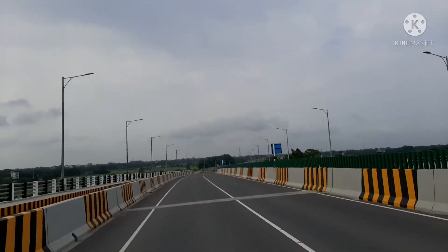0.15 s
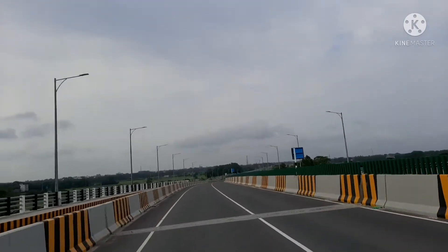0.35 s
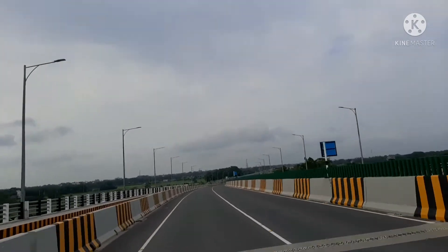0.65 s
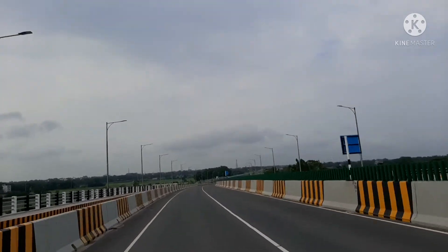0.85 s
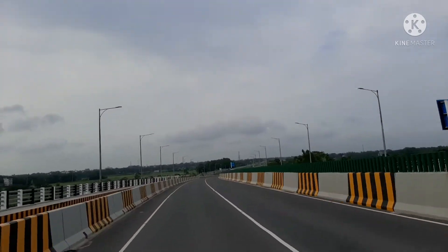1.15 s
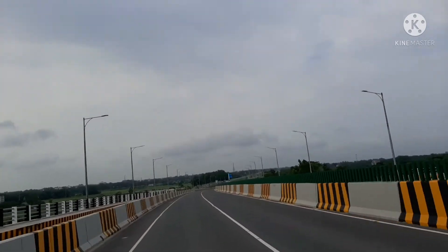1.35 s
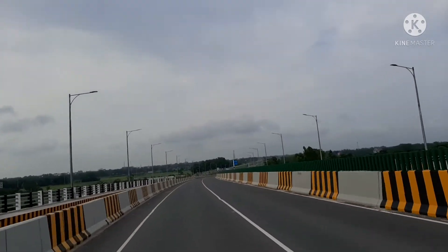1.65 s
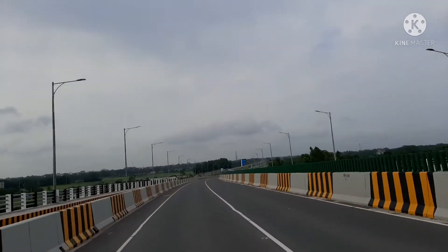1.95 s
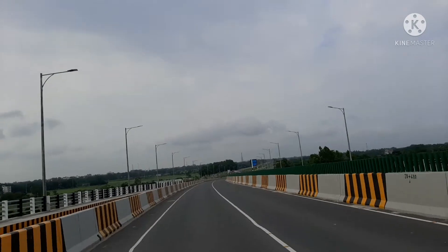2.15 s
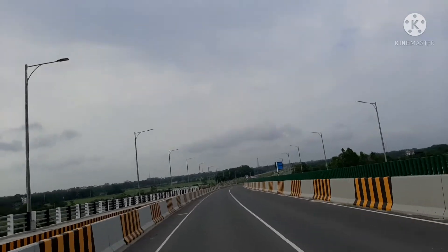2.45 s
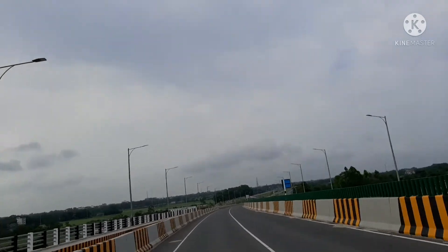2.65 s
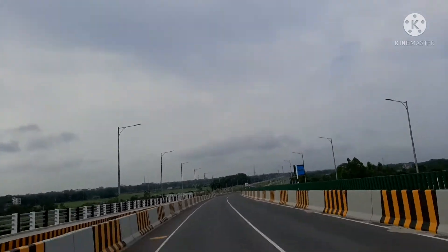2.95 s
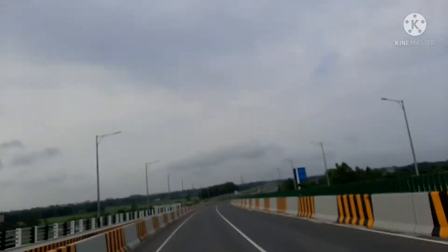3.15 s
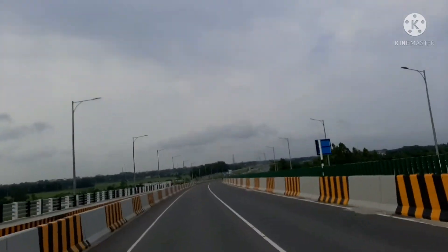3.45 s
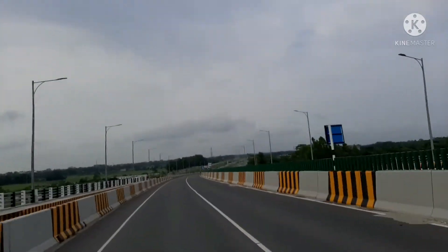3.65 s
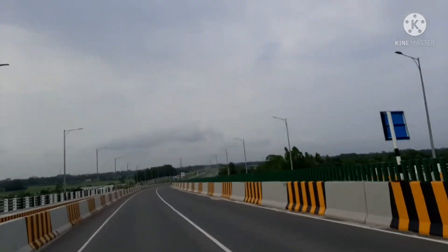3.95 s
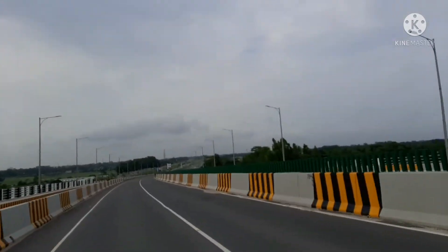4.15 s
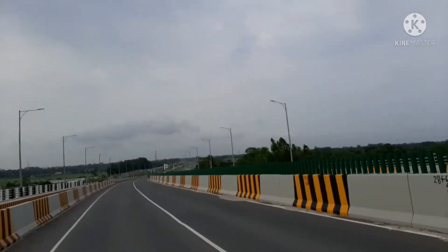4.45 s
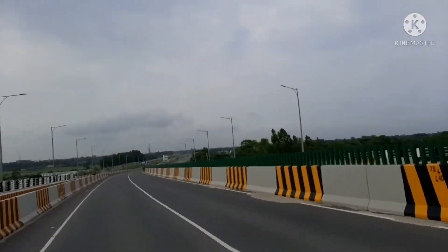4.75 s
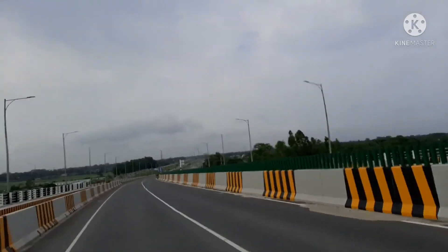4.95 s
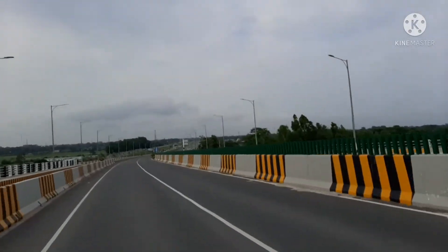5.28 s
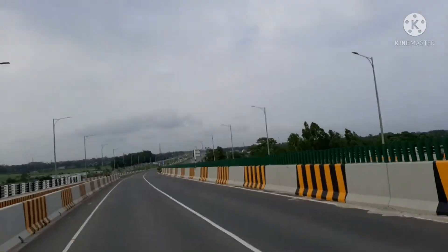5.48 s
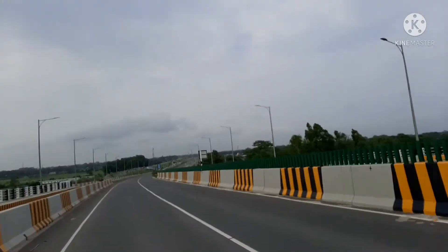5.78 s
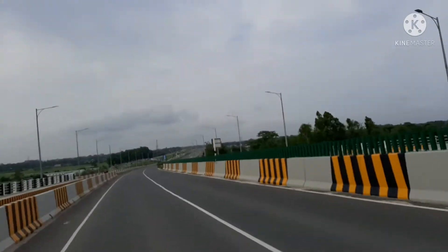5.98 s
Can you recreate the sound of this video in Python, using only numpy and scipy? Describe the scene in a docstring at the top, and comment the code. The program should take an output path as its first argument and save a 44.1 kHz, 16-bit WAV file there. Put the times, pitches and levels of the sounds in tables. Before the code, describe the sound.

Wind buffets an exposed microphone on a fast highway drive, low thumps over steady road rush growing into roaring, tearing gusts.

```python
"""A fast ride along an open highway bridge, heard from a camera held out in the airstream.
Throughout, shaped noise for tyres and rushing air makes a bed over faint hums from narrow noise bands;
low noise puffs and short pressure swings buffet the two microphone ports, with weak tearing on the left.
After two seconds the wind comes head-on: noise roars in gusts, with slaps, hard knocks and sharp snaps.
From about three and a half seconds the stronger tears hiss and fizz across the left port."""
import sys
import numpy as np
from scipy import signal
from scipy.fft import rfft, irfft, next_fast_len
from scipy.io import wavfile
from scipy.ndimage import uniform_filter1d, map_coordinates

SR = 44100
rng = np.random.default_rng(int(sys.argv[2]) if len(sys.argv) > 2 else 0)


def file_out(sig):
    """Save sig as 16-bit WAV at sys.argv[1]."""
    # one column per channel
    cols = np.atleast_2d(sig).T
    # limit, then scale
    lim = np.clip(cols, -1, 1)
    pcm = np.round(lim * 32767).astype(np.int16)
    wavfile.write(sys.argv[1], SR, pcm)


N = 269892


# Body resonances. Each row: centre in Hz, width in Hz, lift in dB.
HOLLOWS_HZ_HZ_DB = [(350, 93, 5.5), (578, 210, 6), (830, 49, 2.5), (1094, 95, 5.5), (1240, 46, 1.5)]


def hollow_db(hz):
    """Lift of the camera body's resonances at each frequency."""
    return sum(
        db / (1 + (2 * (hz - centre_hz) / width_hz) ** 2)
        for centre_hz, width_hz, db in HOLLOWS_HZ_HZ_DB
    )


# Gusts on the whole camera. Each row: start in seconds, length in seconds, level in dB before trim.
GUSTS_S_S_DB = [(0.5, 0.27, -26), (2.15, 0.059, -17), (2.26, 0.31, -17), (2.55, 0.16, -16.5),
                (2.725, 0.04, -14), (2.79, 0.1, -17), (2.925, 0.12, -14), (3.09, 0.032, -14),
                (3.16, 0.055, -19), (3.295, 0.032, -14.5), (3.52, 0.078, -16.5), (3.65, 0.075, -16),
                (3.835, 0.01, -20.5), (3.95, 0.021, -15), (3.998, 0.09, -15.5), (4.135, 0.017, -14),
                (4.18, 0.028, -18.5), (4.28, 0.021, -18), (4.345, 0.063, -19), (4.62, 0.053, -16.5),
                (4.725, 0.053, -16.5), (4.985, 0.084, -17.5), (5.08, 0.089, -16.5), (5.175, 0.034, -14.5),
                (5.355, 0.076, -17), (5.465, 0.075, -14.5), (5.585, 0.033, -12), (5.655, 0.022, -14.5),
                (5.73, 0.032, -16.5), (5.955, 0.028, -15), (6.01, 0.19, -20.5)]
# Fine-grained rasp in the gusts. Each row: time in seconds, level in dB relative to the body roar.
RASP_S_DB = [(3.1, -25), (3.5, -6.5), (4.7, -2), (5.2, -9.5)]
# Spectrum of the body roar. Each row: frequency in Hz, relative density in dB.
ROAR_HZ_DB = [(40, -13), (150, -2.5), (280, -3.5), (450, -0.5), (900, 3.5), (1300, 6), (2000, -4),
              (3000, -16.5), (4500, -33), (7000, -30), (9000, -44.5)]
# Spectrum of the rasp. Each row: frequency in Hz, relative density in dB.
RASP_HZ_DB = [(500, -29), (1100, -9), (1600, 11.5), (2200, 7), (3200, -3), (5000, -17.5), (7000, -28),
              (8400, -60), (12000, -30), (15000, -42)]
GUST_ATTACK_S, GUST_RELEASE_S = 0.041, 0.038  # time constants
WAKE_START_S, WAKE_DB = 2.3, -25.5  # unsettled air between gusts; level before trim


def roar():
    """Gusts break on the camera's body: a hollow roar, with smaller eddies rasping above it."""
    wake = amp(WAKE_DB) * (np.arange(N) / SR > WAKE_START_S)
    force = np.maximum(spells(GUSTS_S_S_DB, GUST_ATTACK_S, GUST_RELEASE_S), wake)

    flutter = capped(eddies(rate_hz=90, depth_db=5.0, shared=0.26), top_db=-1.5)
    flutter = flutter * eddies(rate_hz=300, depth_db=3.0, shared=0.19)
    body = coloured(churned(depth_db=4.5, width_hz=289, life_s=0.014) * flutter, ROAR_HZ_DB)
    body = steadied(filtered(body, lambda hz: amp(hollow_db(hz))))

    rasp = churned(depth_db=6.5, width_hz=429, life_s=0.011)
    rasp = rasp * capped(eddies(rate_hz=110, depth_db=6.0, shared=0.71), top_db=13)
    rasp = steadied(coloured(rasp, RASP_HZ_DB))

    trim = amp(-1.5)
    return trim * force * (body + amp(curves(RASP_S_DB)) * rasp)


# Spells of tearing flow. Each row: start in seconds, length in seconds, flow level in dB.
TEARS_S_S_DB = [(0.26, 0.075, -25), (0.37, 0.06, -29), (0.53, 0.06, -28.5), (1.53, 0.14, -29),
                (1.81, 0.11, -27), (2.05, 0.085, -27), (2.38, 0.12, -29), (2.58, 0.23, -29.5),
                (3.295, 0.04, -27), (3.54, 0.11, -29), (3.675, 0.065, -23), (3.76, 0.1, -25.5),
                (3.98, 0.11, -21), (4.135, 0.02, -23.5), (4.193, 0.016, -24), (4.322, 0.042, -19),
                (4.38, 0.03, -19.5), (4.453, 0.14, -20.5), (4.595, 0.028, -18), (4.65, 0.09, -32),
                (4.745, 0.022, -17), (4.78, 0.04, -22), (4.845, 0.135, -17.5), (4.99, 0.035, -19.5),
                (5.295, 0.019, -24), (5.355, 0.17, -23.5), (5.6, 0.42, -30.5), (6.05, 0.025, -23.5)]
# Spectrum of the tearing hiss. Each row: frequency in Hz, relative density in dB.
TEAR_HZ_DB = [(100, -5), (400, 10), (1000, 8.5), (2000, 8.5), (3000, 6), (4500, -4), (6500, -17),
              (8400, -59), (12000, -26), (15000, -38)]
# Spectrum of the fizz. Each row: frequency in Hz, relative density in dB.
FIZZ_HZ_DB = [(1500, -37), (3000, 4.5), (5000, 3), (6800, -5.5), (8400, -14), (10000, -13), (12200, -9.5),
              (15000, -18)]
# Spectrum of the finest hiss, on both ports. Each row: frequency in Hz, relative density in dB.
SPRAY_HZ_DB = [(8500, -40), (10500, 3), (12500, 2), (15000, -6)]
SPRAY_DB = -28  # relative to the flow
TEAR_ATTACK_S, TEAR_RELEASE_S = 0.013, 0.026  # time constants


def tear():
    """Flow separates at the left port's edge: it sputters when weak, and fizzes fully when strong."""
    flow = spells(TEARS_S_S_DB, TEAR_ATTACK_S, TEAR_RELEASE_S)
    flow = flow * eddies(rate_hz=80, depth_db=1.5, shared=0.18)
    strength = np.minimum(flow * amp(13.5), 1)

    sputter = capped(eddies(rate_hz=62, depth_db=7.5, shared=0), top_db=14)
    sputter = steadied(sputter * eddies(rate_hz=610, depth_db=9.5, shared=0))
    sputter = sputter ** np.clip(1 - 1.12 * strength, 0, 1)  # evens out as the flow strengthens
    hiss = coloured(churned(depth_db=4.0, width_hz=453, life_s=0.018) * sputter, TEAR_HZ_DB)

    fizz = churned(depth_db=3.0, width_hz=570, life_s=0.008)
    fizz = coloured(fizz * eddies(rate_hz=450, depth_db=2.0, shared=0), FIZZ_HZ_DB)
    spray = amp(SPRAY_DB) * coloured(white(), SPRAY_HZ_DB)

    port_gain = amp([[1.3], [-18]])
    return flow * ((hiss + strength * fizz * amp(-3.4)) * port_gain + spray)


# Single slaps. Each row: time in seconds, level in dB, Gaussian spread in seconds,
# sharp edge in dB relative to the body.
SLAPS_S_DB_S_DB = [(0.266, -28, 0.004, 3), (0.412, -14.5, 0.0028, -20), (2.152, -15, 0.01, -22),
                   (2.216, -18.5, 0.01, -16), (3.067, -17.5, 0.0082, -14), (3.358, -14, 0.0027, -1),
                   (3.513, -11, 0.0043, -26), (3.723, -13, 0.008, -6), (3.849, -12, 0.0035, -17),
                   (3.903, -15.5, 0.0015, -18), (3.939, -17, 0.0026, -15), (3.9995, -11, 0.0031, -5),
                   (4.672, -14, 0.015, -23), (5.028, -10, 0.0069, -25), (5.601, -13, 0.0093, -13)]
# Spectrum of a slap's body. Each row: frequency in Hz, relative density in dB.
SLAP_HZ_DB = [(60, -27), (250, -6.5), (600, 3), (1000, 8.5), (1450, 9), (2000, 0.5), (3000, -11.5),
              (4500, -25), (7000, -54), (9000, -48)]


def slaps():
    """A tight vortex bursts on the camera: a short blow whose sharp edge is stronger on the left."""
    t = np.arange(N) / SR
    body = coloured(white(), SLAP_HZ_DB)
    edge = coloured(white(), TEAR_HZ_DB) * amp([[0], [-12]])
    out = np.zeros((2, N))
    for s, db, spread_s, sharp_db in SLAPS_S_DB_S_DB:
        blow = np.exp(-0.5 * ((t - s) / spread_s) ** 2)
        out += amp(db) * blow * (body + amp(sharp_db) * edge)
    return out


# Bright snaps at the left port. Each row: time in seconds, level in dB.
SNAPS_S_DB = [(0.261, -12), (0.321, -15), (1.364, -19), (1.8175, -16.5), (2.115, -14), (2.9267, -10.5),
              (3.061, -13), (3.3592, -2.5), (3.3955, -12.5), (4.1935, -15), (5.195, -18)]
# Spectrum of the snaps. Each row: frequency in Hz, relative density in dB.
SNAP_HZ_DB = [(300, 2), (1500, 8.5), (4000, 8), (5500, -7), (7000, -19), (8500, -27), (11000, -18),
              (15000, -26)]
SNAP_DECAY_S = 0.0012  # time constant


def snaps():
    """The flow snaps off the left port's edge: a bright crack of noise with a very fast decay."""
    t = np.arange(N) / SR
    gain = sum(amp(db) * (t >= s) * np.exp(-np.abs(t - s) / SNAP_DECAY_S) for s, db in SNAPS_S_DB)
    level = np.sqrt(np.mean(gain ** 2))
    return level * coloured(gain * white(), SNAP_HZ_DB) * amp([[0], [-18]])


# Hard knocks. Each row: time in seconds, level in dB, pitch in Hz.
KNOCKS_S_DB_HZ = [(0.414, -16, 300), (3.052, -6.5, 422), (3.358, -4, 515)]
KNOCK_SPREAD_CYCLES = 0.5


def knocks():
    """The whole camera is jolted: one short, dull swing of pressure, the same on both ports."""
    return sum(swing(s, db, hz, KNOCK_SPREAD_CYCLES, np.pi) for s, db, hz in KNOCKS_S_DB_HZ)


# Largest eddies. Each row: time in seconds, level in dB, pitch in Hz, Gaussian spread in cycles.
THUMPS_S_DB_HZ_CYCLES = [(0.519, -16.5, 100, 0.82), (0.579, -24, 94, 1), (0.699, -16.5, 115, 0.54),
                         (0.746, -10.5, 150, 0.28), (0.878, -20, 274, 1.3), (0.881, -17, 130, 0.24),
                         (1.145, -19, 95, 0.7), (1.23, -16.5, 102, 0.71), (1.262, -14, 86, 0.67),
                         (1.39, -21, 115, 0.66), (1.447, -13, 277, 0.66), (1.45, -12, 115, 0.38),
                         (1.538, -15, 178, 0.9), (1.574, -17, 257, 1.2), (1.693, -18.5, 275, 2.2),
                         (1.71, -20, 79.4, 0.46), (1.742, -26, 125, 0.59), (1.779, -13, 135, 0.34),
                         (1.885, -18, 106, 0.69), (1.92, -19, 119, 0.8), (1.97, -20, 146, 0.51),
                         (2.026, -19, 145, 0.8), (2.11, -20.5, 115, 0.58), (2.216, -19, 115, 0.8),
                         (2.439, -14, 127, 0.59), (2.983, -15.5, 99, 0.53), (3.411, -17.5, 133, 1.2),
                         (3.619, -15, 136, 0.34), (4.812, -17, 108, 0.43), (5.994, -21, 108, 0.65)]


def thumps():
    """The largest eddies give a few slow swings of pressure, roughly in step on the two ports."""
    count = len(THUMPS_S_DB_HZ_CYCLES)
    common_phase = rng.uniform(0, 2 * np.pi, (count, 1, 1))
    phases = common_phase + rng.normal(0, 1.0, (count, 2, 1))
    return sum(swing(*row, phase) for row, phase in zip(THUMPS_S_DB_HZ_CYCLES, phases))


# Low buffeting, swinging between ports as the camera turns. Each row: time in seconds,
# left port in dB, right port in dB, both before trim.
BUFFET_S_DB_DB = [(0.05, -27, -28), (0.33, -38, -23.5), (0.45, -21, -25.5), (0.72, -24, -25),
                  (1.0, -31, -27), (1.2, -20, -32), (1.31, -41, -29), (1.41, -26, -27), (1.68, -27, -27),
                  (1.9, -30.5, -26), (2.08, -30, -27.5), (2.25, -19, -46), (2.62, -26.5, -50),
                  (2.8, -20.5, -22), (2.93, -32, -42), (3.08, -25, -19), (3.22, -27, -37),
                  (3.4, -27.5, -26), (3.7, -29, -26.5), (4.25, -30, -27), (4.7, -37, -28.5),
                  (5.3, -32.5, -24), (5.58, -29, -24), (5.82, -55, -30), (6.05, -28, -22.5)]
# Spectrum of the puffs. Each row: frequency in Hz, relative density in dB.
BUFFET_HZ_DB = [(20, -20), (40, -12), (65, -3.5), (95, -1), (140, -1.5), (200, -8), (290, -17), (420, -51),
                (900, -79)]
# Higher flapping. Each row: time in seconds, level in dB relative to the puffs.
FLAP_S_DB = [(0.1, -10.5), (1.1, -11), (1.55, -3), (2.3, -9), (3.3, -2), (4.6, 1), (5.4, -3), (6.0, -2.5)]
# Spectrum of the flapping. Each row: frequency in Hz, relative density in dB.
FLAP_HZ_DB = [(120, -36), (210, -12.5), (300, -6), (420, -25.5), (900, -34), (3000, -80)]


def buffet():
    """Large eddies push on each port in short, low puffs; smaller ones flap at a higher pitch."""
    lumps = eddies(rate_hz=65, depth_db=5.0, shared=0.16) * eddies(rate_hz=28, depth_db=4.5, shared=0.55)
    puffs = coloured(white() * capped(lumps, top_db=4), BUFFET_HZ_DB)
    flap_gain = capped(lumps * eddies(rate_hz=90, depth_db=2.0, shared=0.25), top_db=13)
    flaps = coloured(white() * flap_gain, FLAP_HZ_DB)
    trim_db = -0.56
    return amp(curves(BUFFET_S_DB_DB) + trim_db) * (puffs + amp(curves(FLAP_S_DB)) * flaps)


# Rush of air and tyres, also the base for the crackle. Each row: time in seconds, base level in dB.
AIR_S_DB = [(0.15, -27), (0.3, -25), (0.55, -24), (0.8, -25.5), (1.05, -25.5), (1.28, -25.5), (1.55, -23.5),
            (2.0, -26), (2.12, -23), (2.45, -25.5), (3.2, -28.5), (3.6, -25.5), (4.6, -27), (5.0, -28),
            (5.24, -33.5), (6.11, -31.5)]
# Spectrum of the rush. Each row: frequency in Hz, relative density in dB.
AIR_HZ_DB = [(60, -19), (200, -2), (300, 5), (430, -1.5), (750, -5), (1400, -1), (2000, -4.5),
             (3000, -10.5), (4800, -17.5), (7300, -25), (8200, -42), (10000, -27.5), (12500, -23),
             (15000, -26)]
# Finest hiss of the rush, above 8400 Hz. Each row: time in seconds, lift in dB.
SHEEN_S_DB = [(2.2, -4), (3.0, -2.5), (3.7, -7.5), (5.3, 0.5), (5.9, -0.5)]


def road():
    """Air and road noise rush past the vehicle; the lower part flutters more than the hiss."""
    rush = coloured(churned(depth_db=4.0, width_hz=252.6, life_s=0.025), AIR_HZ_DB)
    low = filtered(rush, lambda hz: 1 / (1 + (hz / 2400) ** 4))
    top = filtered(rush, lambda hz: hz > 8400)
    hiss = rush - low + (amp(curves(SHEEN_S_DB)) - 1) * top
    low_flutter = capped(eddies(rate_hz=70, depth_db=4.5, shared=0.035), top_db=2.5)
    hiss_flutter = eddies(rate_hz=70, depth_db=1.5, shared=0.4)
    return (low * low_flutter + hiss * hiss_flutter) * amp(curves(AIR_S_DB) + 1.5)


def crackle():
    """Tiny pops at the ports, random in time and size, ride on the rushing air."""
    size = amp(3.8 * np.minimum(rng.exponential(size=(2, N)), 2.5))
    pops = (rng.random((2, N)) < 90 / SR) * size  # 90 a second on each port, on average
    # Each row: frequency in Hz, relative density in dB.
    colour_hz_db = [(300, 7.0), (1500, 11.5), (3500, -22.5), (6000, -0.5), (8400, -52), (15000, -26)]
    return amp(curves(AIR_S_DB) - 9.0) * coloured(pops, colour_hz_db) * amp([[0], [-4]])


# Brief level shifts, mostly lulls. Each row: time in seconds, Gaussian spread in seconds,
# left port in dB, right port in dB.
LULLS_S_S_DB_DB = [(3.38, 0.0063, -1, -2), (3.437, 0.008, -6, -5), (3.795, 0.008, -1.5, -2),
                   (3.882, 0.019, -4, -4), (3.925, 0.007, 2, -4), (4.114, 0.008, -3, -4),
                   (4.169, 0.0067, -6, -6), (4.244, 0.013, -1, -5), (4.442, 0.005, -1, -3),
                   (4.835, 0.008, 2.5, 0.5)]


def lulls():
    """Gain of the rushing air at each port: mostly brief drops, with a few small lifts on the left."""
    t = np.arange(N) / SR
    shift_db = np.zeros((2, N))
    for s, spread_s, left_db, right_db in LULLS_S_S_DB_DB:
        shift_db += np.outer([left_db, right_db], np.exp(-0.5 * ((t - s) / spread_s) ** 2))
    return amp(shift_db)


# Engine drone, tread whine and faint whistle. Each row: centre in Hz, width in Hz, level in dB.
HUMS_HZ_HZ_DB = [(87.7, 12, -41), (1368, 42, -39), (6110, 62, -62)]


def hums():
    """Engine, tread and whistle sound as narrow bands of noise: fuzzy lines far under the wind."""
    out = np.zeros((2, N))
    for centre_hz, width_hz, db in HUMS_HZ_HZ_DB:
        line = filtered(white(), lambda hz: 1 / (1 + (2 * (hz - centre_hz) / width_hz) ** 2))
        out += amp(db) * unit(line)
    return out


def spells(rows, attack_s, release_s):
    """Gain of (start, length, dB) spells: each builds, holds and dies away; the strongest prevails."""
    t, gain = np.arange(N) / SR, np.zeros(N)
    for start_s, length_s, db in rows:
        before = np.maximum(start_s - t, 0) / attack_s
        after = np.maximum(t - start_s - length_s, 0) / release_s
        gain = np.maximum(gain, amp(db) * np.exp(-before - after))
    return gain


def swing(s, db, hz, spread_cycles, phase):
    """A pressure swing: a sine under a Gaussian centred on time s."""
    cycles = (np.arange(N) / SR - s) * hz
    near, out = np.abs(cycles) < 10, np.zeros((2, N))
    envelope = np.exp(-0.5 * (cycles[near] / spread_cycles) ** 2)
    out[:, near] = amp(db) * envelope * np.sin(2 * np.pi * cycles[near] + phase)
    return out


def churned(depth_db, width_hz, life_s):
    """Noise for the two ports in which each small eddy lifts or lowers its own band for a moment."""
    hz, t, z = signal.stft(white(), SR, nperseg=256)
    knots = rng.standard_normal((2, 128, 2048))  # port, band, moment
    at = np.meshgrid(hz / width_hz, t / life_s, indexing="ij")
    field = unit(np.array([map_coordinates(k, at, order=1, mode="mirror") for k in knots]))
    gain = amp(depth_db * 2 * np.tanh(field / 2))
    return unit(signal.istft(z * gain, nperseg=256)[1][:, :N])


def eddies(rate_hz, depth_db, shared):
    """Gain of passing eddies; a share of them covers both ports."""
    shared = np.clip(shared, 0, 1)
    swirl = np.sqrt(shared) * wobble(rate_hz) + np.sqrt(1 - shared) * wobble(rate_hz, channels=2)
    return unit(amp(depth_db * np.tanh(swirl / 2) * 2))


def capped(gain, top_db):
    """An eddy can push only so hard: gains level off near top_db over their rms."""
    ratio = unit(gain) / amp(top_db)
    return unit(ratio / (1 + ratio ** 4) ** (1 / 4))


STEADY_S = 0.06  # averaging time; longer swells belong to the gusts


def steadied(x):
    """Eddying flow whose mean strength holds while its quick flutter stays."""
    power = uniform_filter1d(x ** 2, int(STEADY_S * SR))
    power = uniform_filter1d(power, int(STEADY_S * SR / 2))
    return x / np.sqrt(np.abs(power) + 1e-9)


def wobble(rate_hz, channels=1):
    """Smooth random curves with rate_hz knots a second."""
    at = np.arange(0, N + 16, 16)  # evaluated every 16 samples
    knots = rng.standard_normal((channels, int(N * rate_hz / SR) + 4))
    smooth = [map_coordinates(k, [at * rate_hz / SR], mode="mirror") for k in knots]
    return np.array([np.interp(np.arange(N), at, curve) for curve in smooth])


def white():
    """Unrelated white noise for the two ports."""
    return rng.standard_normal((2, N))


def coloured(x, points):
    """x shaped by (Hz, dB) points, at rms 1."""
    f, db = np.transpose(points)
    return unit(filtered(x, lambda hz: amp(np.interp(np.log(hz + 1), np.log(f), db))))


def filtered(x, response):
    """x times a response of frequency."""
    size = next_fast_len(N + 8192)
    spectrum = rfft(x, size) * response(np.fft.rfftfreq(size, 1 / SR))
    return irfft(spectrum, size)[..., :N]


def curves(rows):
    """One value per sample for each column after the time."""
    s, *cols = np.transpose(rows)
    return np.array([np.interp(np.arange(N) / SR, s, c) for c in cols])


def amp(db):
    """Decibels to gain."""
    return 10 ** (np.asarray(db) / 20)


def unit(x):
    """Scale to rms 1."""
    return x / np.sqrt(np.mean(x ** 2) + 1e-20)


def scene():
    """Everything that reaches the two ports; the lulls act on the rushing air alone."""
    rush = lulls() * (roar() + tear() + road() + crackle())
    return rush + slaps() + snaps() + knocks() + thumps() + buffet() + hums()


TOP_HZ = 15500


def record(dry):
    """The camera rounds off the highest peaks and keeps nothing above its band limit."""
    rounded = dry / (1 + np.abs(dry) ** 6) ** (1 / 6)
    return filtered(rounded, lambda hz: hz < TOP_HZ)


dry = scene()
out = record(dry)
file_out(out)
```